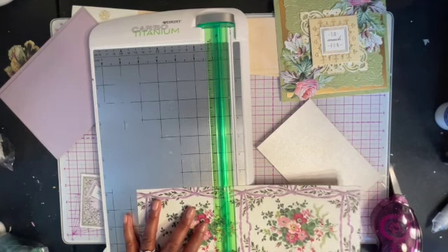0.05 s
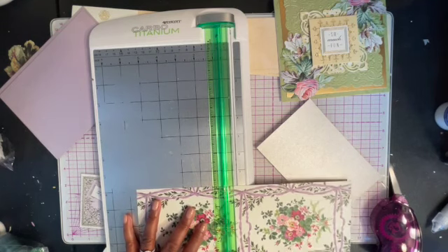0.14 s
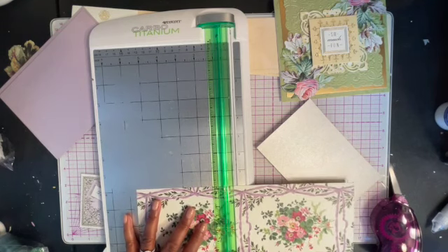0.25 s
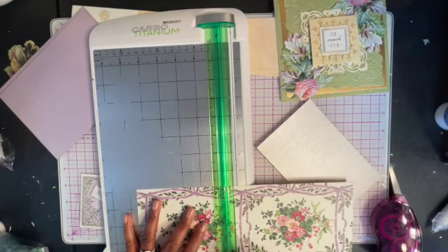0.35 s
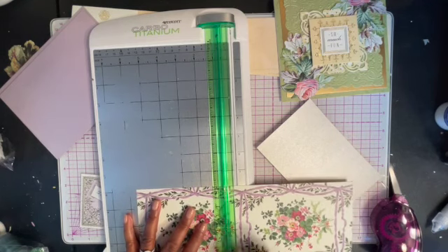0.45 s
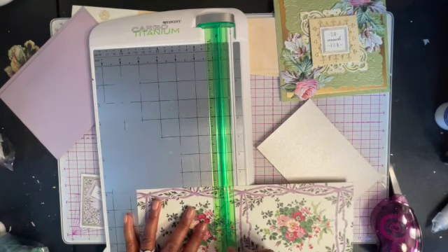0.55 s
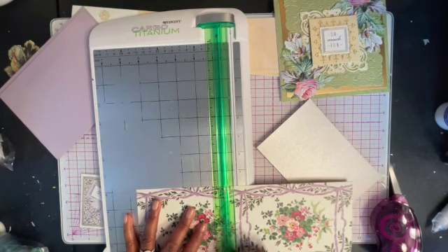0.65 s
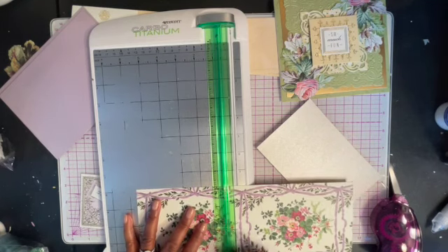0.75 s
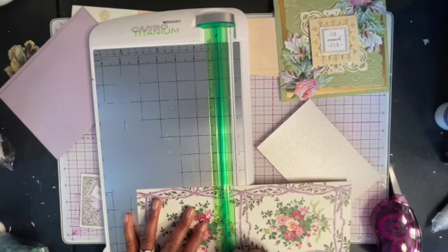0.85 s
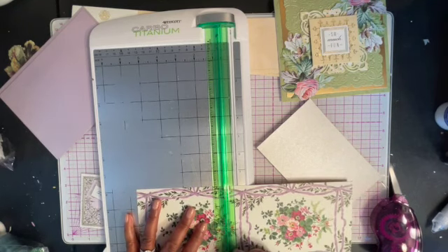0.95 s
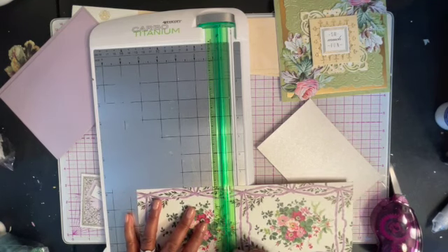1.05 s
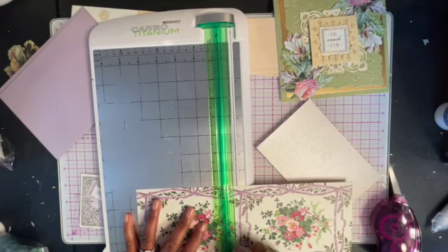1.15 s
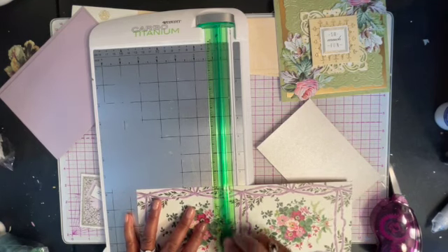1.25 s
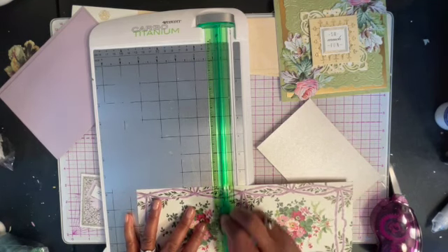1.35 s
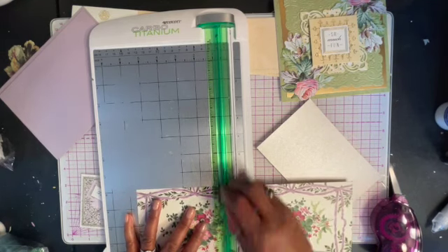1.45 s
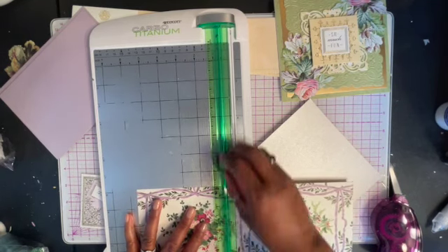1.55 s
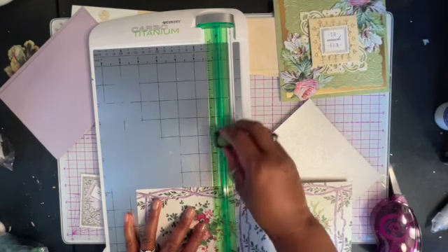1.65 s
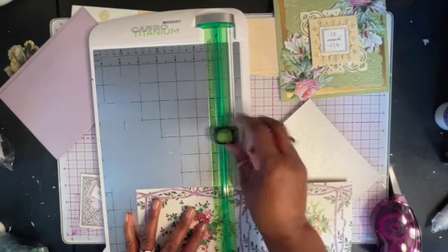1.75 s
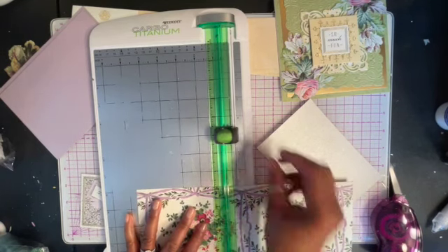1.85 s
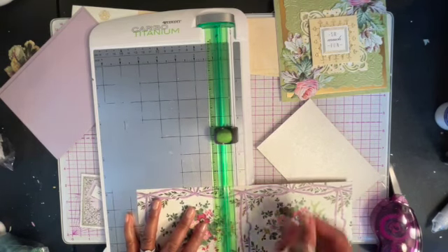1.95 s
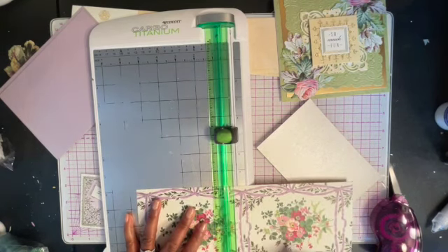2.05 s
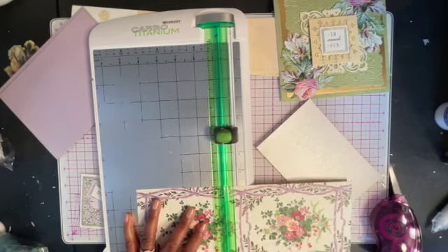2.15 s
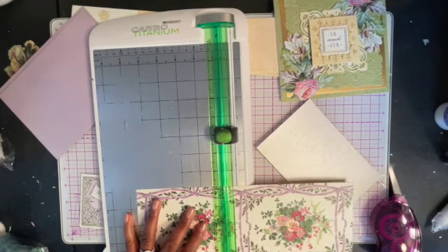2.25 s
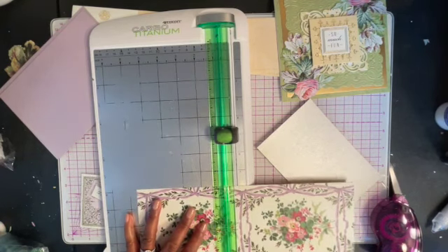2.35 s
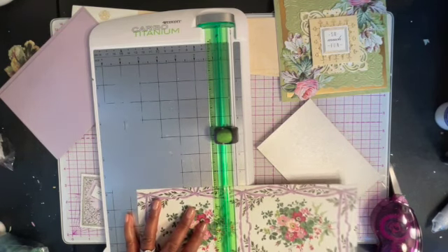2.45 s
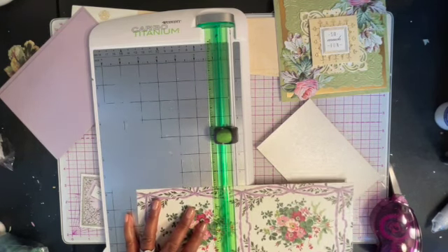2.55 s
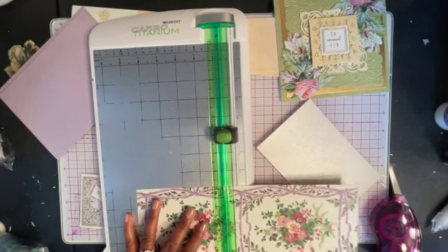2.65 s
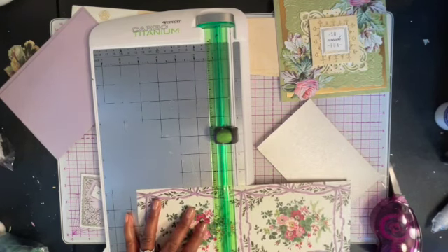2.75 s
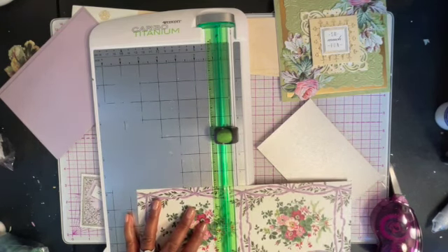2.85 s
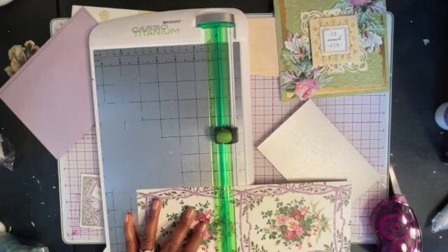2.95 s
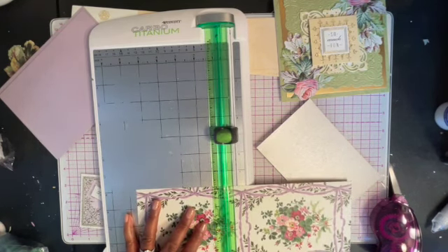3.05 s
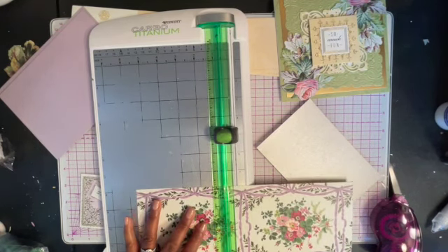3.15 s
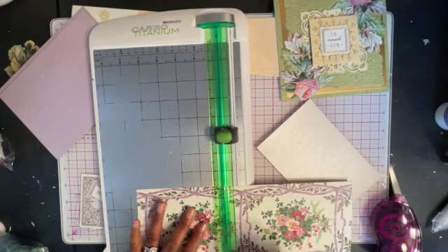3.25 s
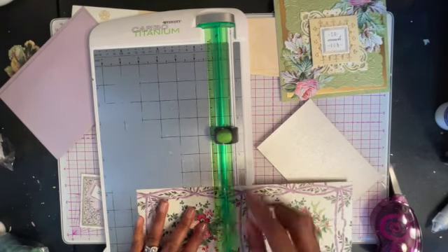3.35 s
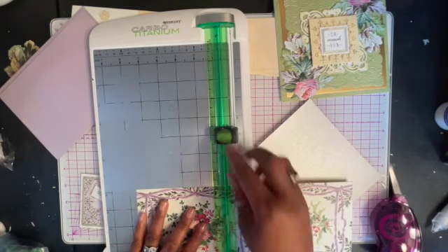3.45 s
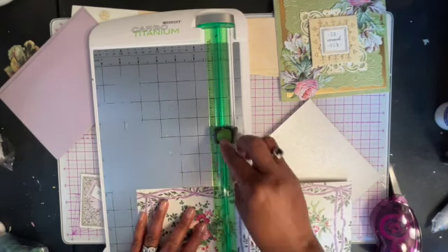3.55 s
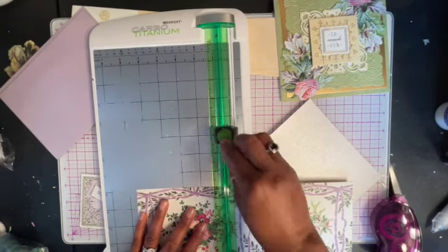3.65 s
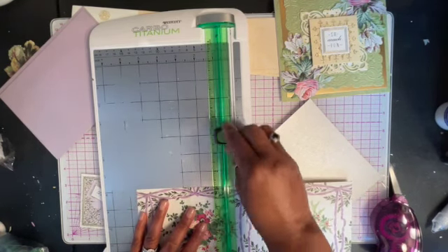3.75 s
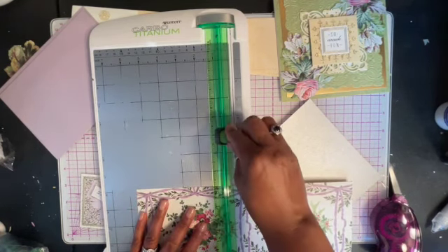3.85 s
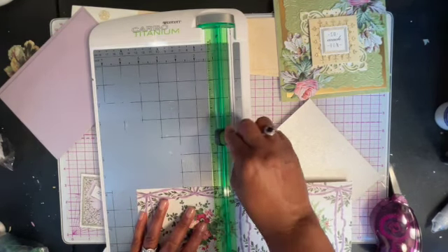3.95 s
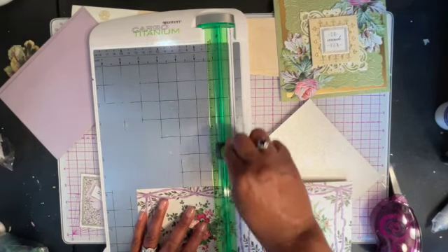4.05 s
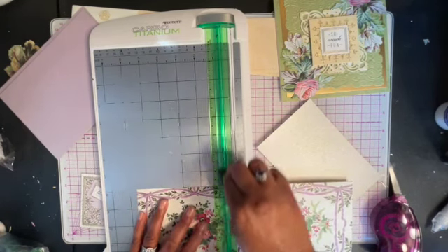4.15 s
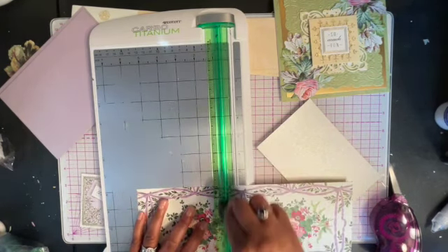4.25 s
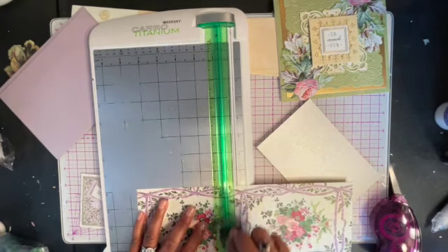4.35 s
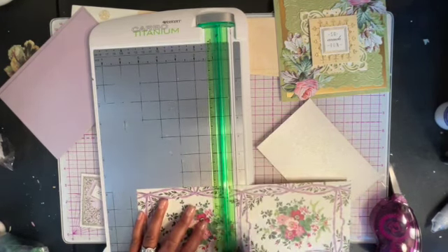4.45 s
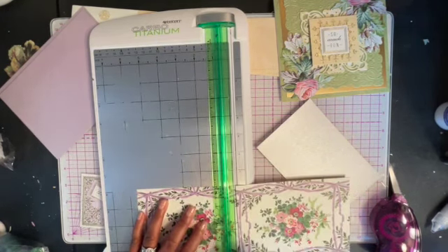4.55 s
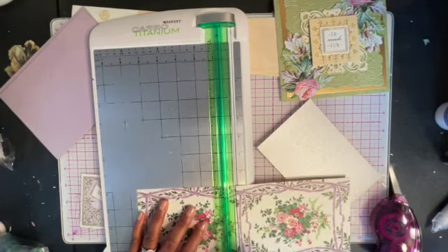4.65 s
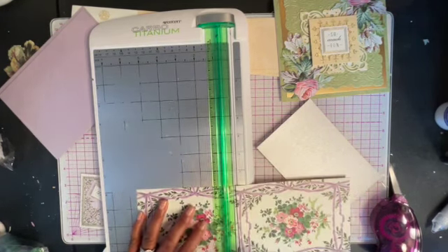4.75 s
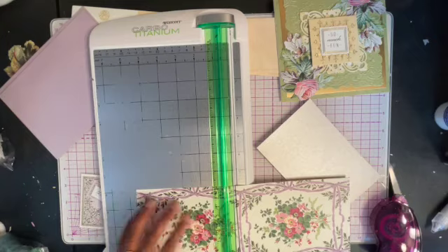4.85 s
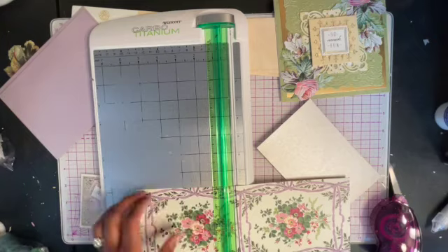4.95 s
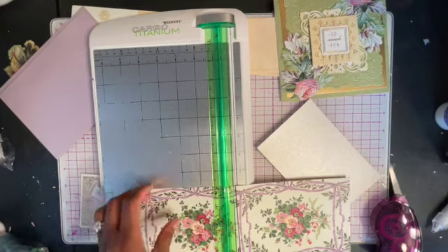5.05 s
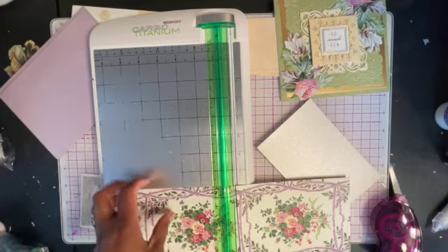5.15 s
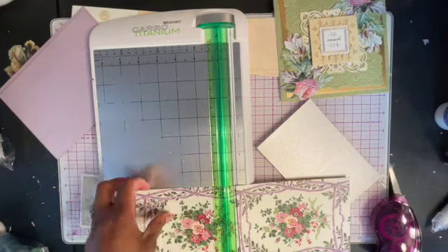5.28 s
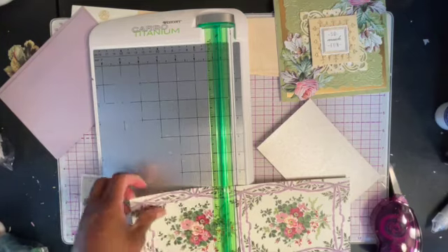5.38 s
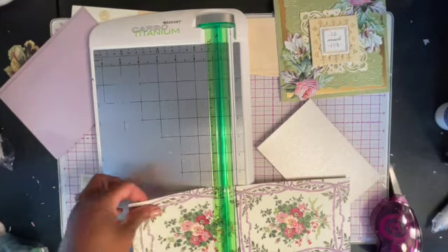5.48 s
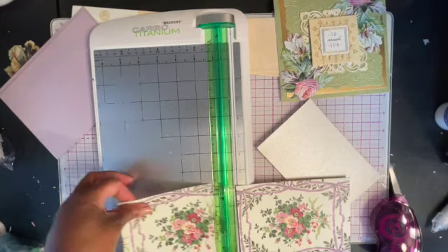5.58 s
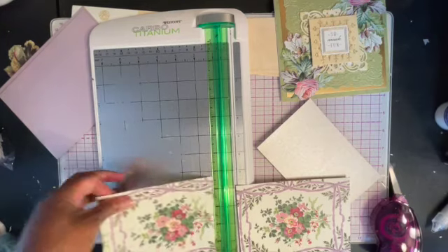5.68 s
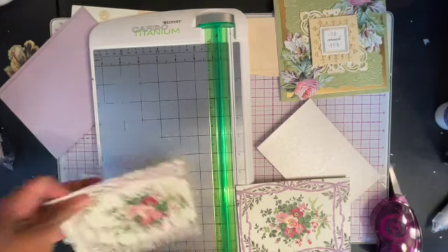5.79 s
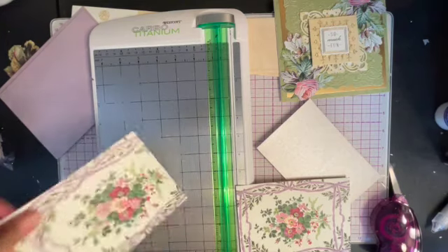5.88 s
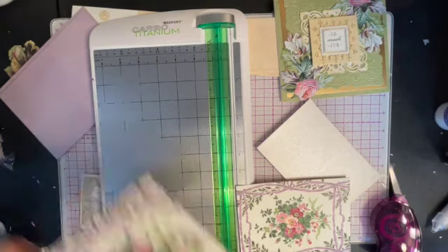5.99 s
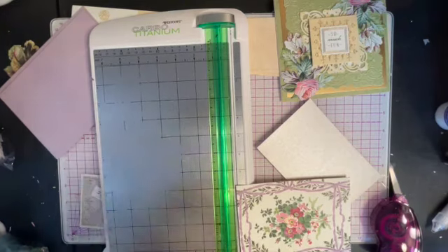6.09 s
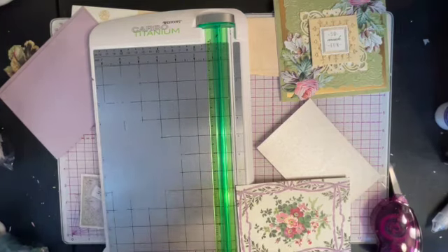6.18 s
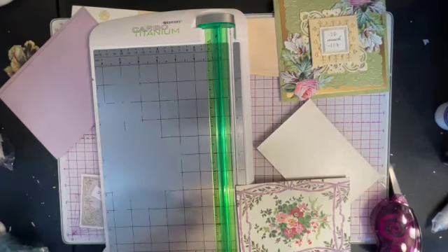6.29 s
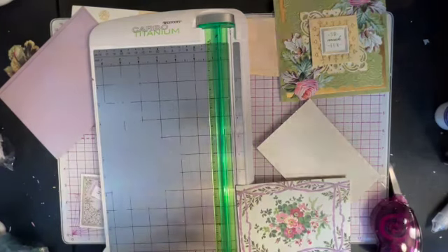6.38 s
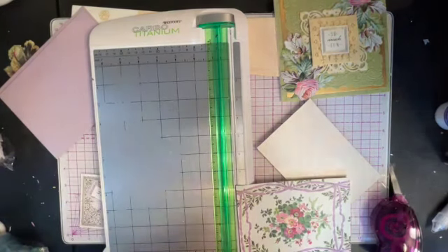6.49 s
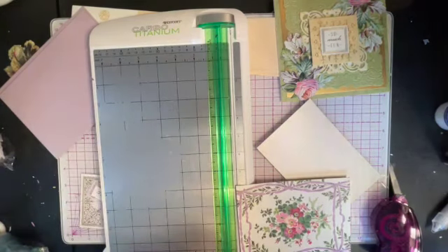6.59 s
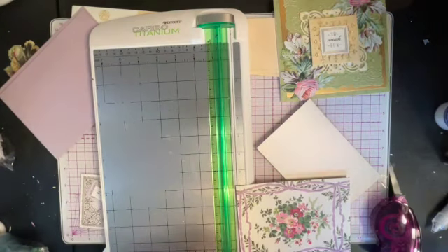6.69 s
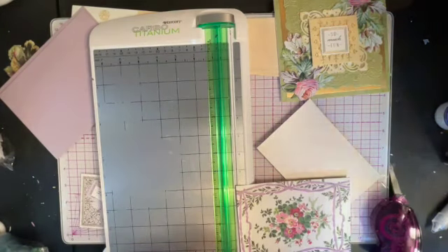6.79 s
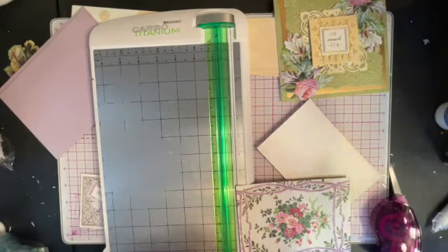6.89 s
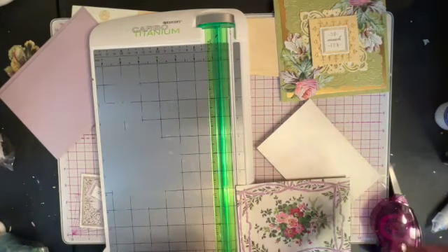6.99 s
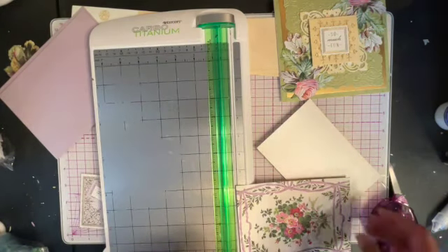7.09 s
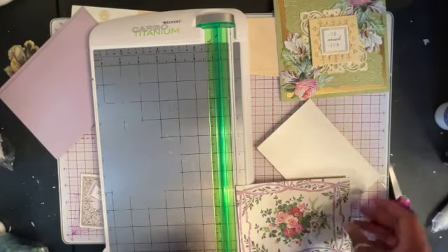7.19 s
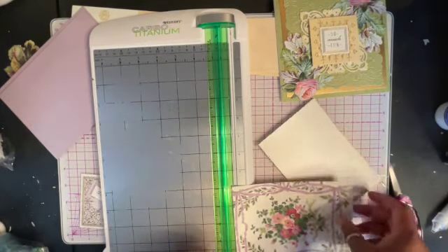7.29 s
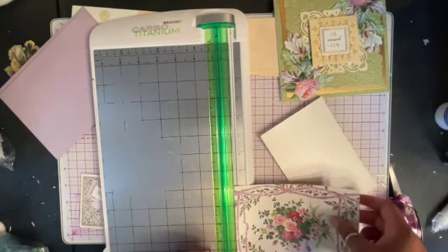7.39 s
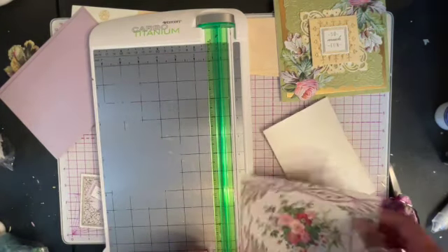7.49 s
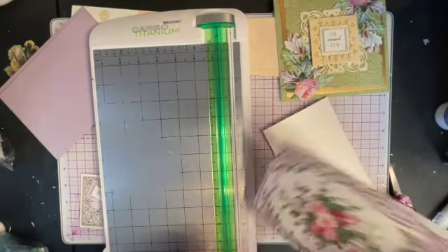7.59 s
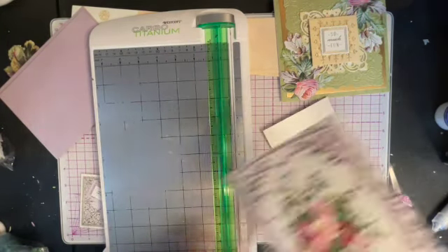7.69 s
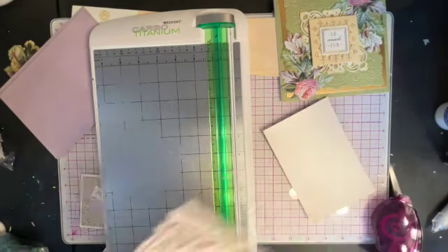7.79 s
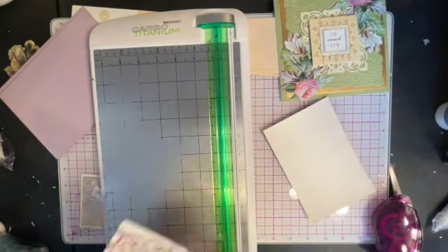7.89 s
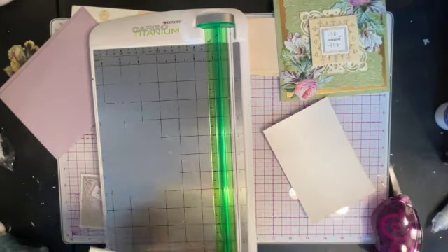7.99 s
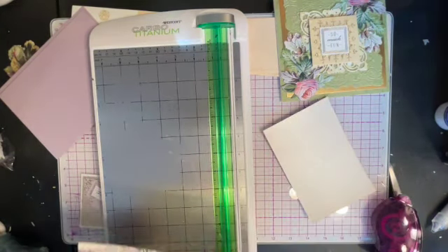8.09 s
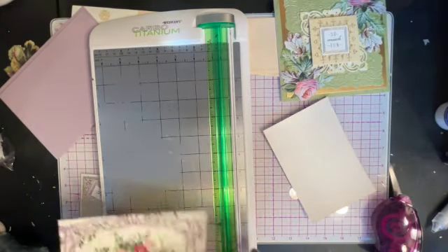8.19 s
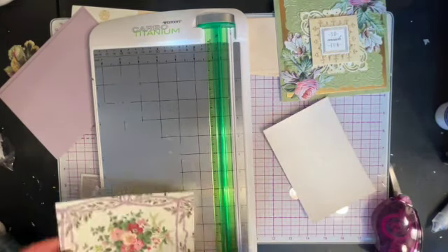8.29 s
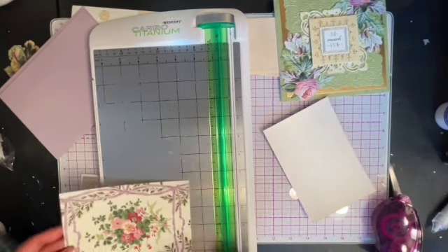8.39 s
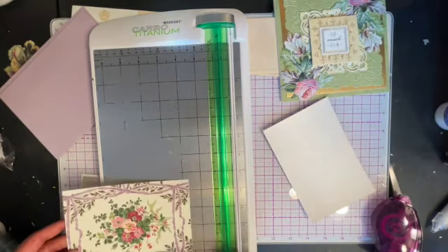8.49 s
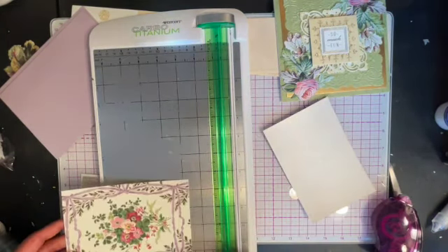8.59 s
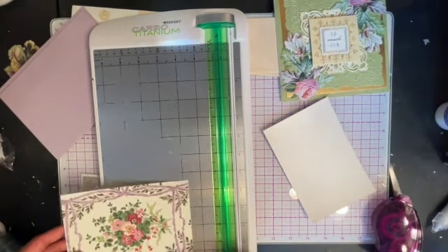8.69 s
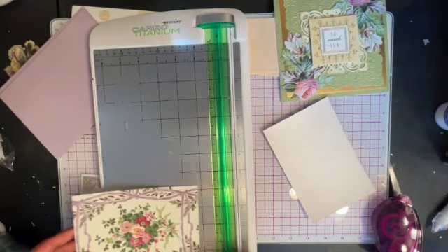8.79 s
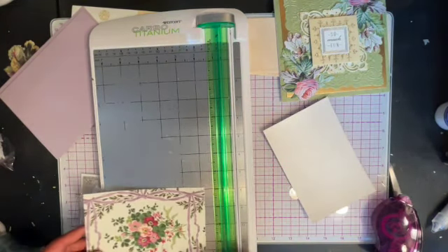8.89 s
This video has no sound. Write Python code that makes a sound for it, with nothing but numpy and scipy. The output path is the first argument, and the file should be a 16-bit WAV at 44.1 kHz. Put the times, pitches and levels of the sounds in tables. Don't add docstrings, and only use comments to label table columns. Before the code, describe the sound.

At a craft table, close up in stereo, a plastic paper trimmer clicks and taps while its carriage rubs lightly along the rail. A brief, rising, hissing slice cuts card and ends in a hard clack. Then a crisp snap, a quick papery pull with a loud high click, and cut pieces sliding, snapping and swishing away over soft thumps. The small quiet room hums faintly.

```python
import sys
import numpy as np
from scipy import signal
from scipy.fft import rfft, irfft, next_fast_len
from scipy.io import wavfile
from scipy.ndimage import uniform_filter1d, map_coordinates

SR = 44100
rng = np.random.default_rng(int(sys.argv[2]) if len(sys.argv) > 2 else 0)


def boost_factor(decibels):
    exponent = np.asarray(decibels, float) / 20
    return 10 ** exponent


def bounce(signal):
    frames = np.transpose(np.atleast_2d(signal))
    limited = np.clip(frames, -1, 1)
    pcm = np.round(limited * 32767).astype(np.int16)
    wavfile.write(sys.argv[1], SR, pcm)


N = 393792

# f/Hz, width/Hz, level/dB
DECK_MODES = [(630, 39.4, 7), (758.7, 24.3, 7), (882, 53, -2.5), (1130, 21, -9), (1390, 77, -14)]
TABLE_MODES = [(140, 14.2, 4.5), (192, 34, -1), (240, 22.8, -0.5), (320.6, 101, -8.5), (366, 84, -7),
               (474, 236, -16)]
SHELL_MODES = [(1280, 610, -3), (2010, 320, -0.5), (2500, 624, -2), (3440, 500, -2.5), (3740, 340, -3)]
STAND_MODES = [(42.6, 30, 0.5), (64.6, 88, -1)]
DEAD_HZ, DEAD_WIDTH_HZ, DEAD_DB = 454, 53, -8

# f/Hz, level/dB per Hz
HISS_COLOUR = [(2500, -16), (4000, -2.5), (5500, 3.5), (7200, 3), (9500, 4), (12000, -2), (14000, -1.5),
               (15600, -1)]
AIR_COLOUR = [(15, -47), (25, -54), (69, 7), (168, -1.5), (315, -12.5), (487, 7.5), (716, -8.5),
              (890, -2.5), (1110, -15.5), (2020, -11.5), (3280, -30.5), (5850, -32), (8000, -41.5),
              (10400, -46.5), (17600, -120)]
AIR_DB = -64.5
# f/Hz, t60/s
ROOM_T60 = [(200, 0.35), (1500, 0.046), (8000, 0.06)]

# f/Hz, lead/rad
PORT_LEAD = [(150, 0), (800, -.9), (1200, .8), (3000, .7), (5000, 1.2), (7000, 1.9), (8600, 2.65),
             (10500, 3.14), (11600, 3.4), (13000, 5.3), (16000, 6.3)]
# f/Hz, likeness/1
PORT_LIKENESS = [(60, .99), (300, .98), (600, .9), (1500, .88), (2800, .85), (4500, .68), (8500, .95),
                 (10500, .92), (14000, .94)]
# f/Hz, level/dB
PORT_LEAN = [(400, -.5), (1400, -1.5), (3000, -2), (6000, -.4)]

# t/s, level/dB
SHAKES = [(.4, -57), (0.718, -52.5), (1.27, -58.5), (2.13, -62), (3.6, -55.5), (3.85, -49.5), (4.18, -47),
          (4.53, -45.5), (5.15, -57.5), (5.36, -58), (5.76, -54.5), (7.27, -49), (8.501, -59)]
SHAKE_RISE_S, SHAKE_FALL_S = 0.1, 0.28

# fastest t/s, rise/s, fall/s, fibre hiss level/dB, scrape over hiss/dB
HAND_SLIDES = [(0.047, 0.68, 0.044, -62.5, 7), (.8, 0.29, 0.077, -77.5, 9), (.918, 0.038, 0.17, -81.5, 13),
               (1.162, 0.01, 0.71, -65.5, 2.5), (1.448, 0.2, 0.16, -55.5, -1.5), (1.66, 0.4, 0.046, -70, 0),
               (1.798, 0.077, 0.029, -83.5, 19.5), (2.23, 0.14, 0.059, -79, 19),
               (2.608, 0.18, 0.16, -68.5, 8.5), (3.065, 0.093, 0.025, -68, 9.5),
               (3.2, 0.043, 0.37, -73.5, -0.5), (4.146, 0.2, 0.14, -57, 9), (4.96, 0.38, 0.028, -66.5, 2.5),
               (5.148, 0.21, 0.019, -70, 4), (5.24, 0.036, 0.27, -65.5, 7), (5.448, 0.12, 0.3, -60.5, 7),
          (5.77, .05, 0.14, -65, 4.5), (5.955, 0.087, 0.028, -66, 3.5), (6.142, 0.03, 0.17, -48.5, -4),
          (6.36, 0.12, 0.87, -91.5, 17), (6.614, 0.0098, 0.049, -61.5, 3.5), (6.798, 0.25, 0.85, -67.5, 2),
          (7.231, 0.027, 0.15, -53.5, 1.5), (7.483, 0.05, 0.11, -59.5, 7), (7.674, 0.069, 0.14, -59, 0),
          (7.89, 0.068, .15, -58, 4.5), (7.945, 0.07, 0.068, -48.5, 1.5), (7.99, 0.044, 0.14, -52.5, -2.5),
          (8.07, 0.045, 0.089, -61, 2.5), (8.26, 0.14, 1, -68.5, -5), (8.582, 1, 1, -73, 4.5),
          (8.93, 0.0074, 0.16, -51, 9.5)]
# start t/s, end t/s, fibre hiss level/dB, scrape over hiss/dB
STROKES = [
    (4.201, 4.505, -48.5, 5),
    (5.541, 5.708, -44.5, -4),
    (7.334, 7.398, -58, -3.5),
    (7.433, 7.493, -54.5, -5.5),
]
STROKE_RISE_S, STROKE_FALL_S = 0.015, 0.013
# heaviest t/s, rise/s, fall/s, deck drone level/dB, table rumble over drone/dB
PRESSES = [(0.0, .1, 0.22, -64.5, 3.5), (.84, 0.26, 0.34, -63.5, -1), (1.036, 0.22, 0.02, -54.5, -3),
           (1.236, 0.29, 0.79, -58.5, 1.5), (2.243, 0.097, 0.036, -35.5, -14), (2.592, 0.18, 0.2, -57, 3),
           (3.075, 0.072, 0.11, -57.5, 7.5), (3.55, 0.1, 0.1, -59, 0), (4.075, 0.25, 0.35, -43.5, -5.5),
           (4.17, .03, 0.44, -54.5, 8), (4.28, 0.2, 0.15, -44, -7), (4.46, 0.058, 0.093, -51.5, 1),
           (4.525, 0.027, 0.058, -41, 4.5), (4.841, 0.006, 0.28, -57.5, 13.5),
           (4.998, 0.057, 0.33, -61.5, 9), (5.242, 0.023, 0.078, -51, 1), (5.7, 0.62, 0.23, -51.5, -8.5),
           (5.8, 0.061, 2.3, -68.5, 4), (6.136, 0.08, 0.093, -65.5, 13), (6.476, 0.22, 7.3, -70.5, 3),
           (7.27, 0.073, 0.19, -43, 1.5), (7.94, 0.15, 0.13, -54.5, -5.5), (8.25, 0.012, 0.045, -55, -3),
           (8.52, 0.15, 2.9, -65, -6)]
REST_HISS_DB, REST_SCRAPE_DB, REST_DECK_DB, REST_TABLE_DB, REST_SWAY_DB = -102, -83, -76, -75.5, -74.5
PATCH_DB, GRAIN_DB = 3.1, 2.8
CATCHES_PER_S, CATCH_DB, CATCH_SCATTER_DB, LARGEST_CATCH = 300, -7.5, 6.5, 2.5

# t/s, crack peak level/dB, deck ring over crack/dB, bright tip over crack/dB
TAPS = [(0.6804, -42.5, 6, -29), (.8275, -62, 14, -14), (0.9382, -54, 13.5, -31), (0.9928, -43.5, -5, -21),
        (1.1488, -51, 0.5, -20), (1.5536, -48, 5.5, -27), (1.7928, -50.5, 3, -16), (2.2152, -42.5, 1, -63),
        (3.78, -31, 4, -33), (3.844, -30, 5, -30), (4.1948, -49.5, 10, -8), (4.6924, -45.5, 2, -35),
        (4.761, -55, 16.5, -23), (4.9263, -45, 3.5, -7), (5.1078, -41, 11, -18.5), (5.215, -44, 4.5, -22.5),
        (5.231, -42.5, 2.5, -23), (5.5085, -39, 8.5, -16), (8.3232, -56, 6, -30), (8.4576, -45, 8.5, -19),
        (8.6881, -55.5, 9, -32)]
TAP_HZ, TAP_T60_S = 1230, 0.046
# t/s, crack peak level/dB, bright tip over crack/dB, crack f/Hz, t60/s
CLACKS = [(0.3563, -24.5, -28.5, 1360, 0.046), (0.7182, -45, -26, 2630, 0.2),
          (0.773, -29, -34, 1390, 0.043), (0.9204, -43, -15.5, 2120, 0.033), (1.268, -31, -41, 1640, 0.019),
          (1.677, -44.5, -25, 1340, 0.035), (2.0852, -46.5, -12, 2390, 0.047),
          (2.1392, -29.5, -24.5, 1090, 0.034), (2.164, -29, -30, 1330, 0.056),
          (2.5713, -46, -19, 1850, 0.15), (2.7447, -50, -3.5, 2370, 0.033),
          (3.0725, -45.5, -42, 1380, 0.066), (3.5187, -43, -22, 2580, 0.031),
          (4.133, -40, -9.5, 2740, 0.048), (4.5185, -14.5, -21.5, 1290, 0.031),
          (4.9785, -32.5, -20.5, 1270, 0.063), (5.71, -18, -18.5, 3320, 0.044),
          (6.094, -43.5, -10.5, 1117, 0.12), (6.135, -31, -16, 1038, 0.04), (6.61, -45, -14, 1600, 0.051),
          (7.243, -14.5, -15.5, 3000, 0.068), (7.2542, -17.5, -18, 2350, 0.024)]
SNAPS = [(.149, -48, -5.5, 2330, 0.019), (1.2081, -38, -27.5, 1240, 0.13), (1.3, -32, -36, 2500, 0.044),
         (2.107, -43, -7, 4500, 0.01), (2.4918, -41.5, -2, 4320, 0.021), (4.6002, -28.5, -33, 1360, 0.033),
         (4.7157, -16.5, -26, 2380, 0.0088), (5.151, -46.5, -11, 4440, 0.045),
         (5.3433, -35, -18.5, 3360, 0.045), (5.3925, -35, -22, 2760, 0.06),
         (5.4367, -39.5, -11, 2695, 0.091), (6.1619, -38.5, -4, 2770, 0.018),
         (6.1971, -34.5, -13, 1800, .09), (6.2564, -35, -13, 1130, 0.037), (7.216, -52, -9, 2530, .053),
         (7.8463, -46, -15.5, 1260, 0.08), (8.2288, -34.5, -16, 1720, 0.031),
         (8.8556, -49.5, -4, 3120, 0.1)]
CLACK_RING_DB, SNAP_RING_DB = -6.5, -14.5
RING_LOSS_DB = 2

# t/s, peak level/dB, f/Hz, t60/s
FLICKS = [(.349, -44, 1900, .08), (3.772, -40, 810, 0.1), (3.781, -21.5, 765, 0.038),
          (3.838, -40, 1450, .06), (4.133, -40, 9000, .03), (4.716, -31, 2700, 0.019),
          (5.076, -55, 4100, 0.046), (5.109, -25.5, 674, 0.024), (5.232, -32.5, 707, 0.035),
          (5, -31.5, 660, 0.028), (5.712, -19, 3230, .025), (7.236, -31, 3200, 0.058),
          (7.258, -26, 1950, 0.017), (7.285, -37, 1160, 0.032), (8.7, -41.5, 750, 0.11),
          (7.545, -54, 4200, .03), (2.18, -36, 480, 0.1), (2.205, -35, 410, 0.059),
          (2.247, -42, 334, 0.051), (1.3, -46, 2700, 0.046), (1.3, -43, 2330, .05), (4.3, -37, 2450, 0.02),
          (7.245, -21, 310, .022), (5.712, -20, 760, 0.06), (6.013, -42.5, 393, 0.045),
          (1.03, -59, 1900, 0.032), (4.717, -20.5, 2050, 0.02), (4.522, -19, 790, 0.048),
          (.36, -32, 2930, 0.048), (2.336, -51, 1370, .06), (5.712, -25, 1350, .045)]
# t/s, peak level/dB, f/Hz, t60/s
NUDGES = [(1.136, -48, 626, 0.048), (1.226, -40, 640, 0.22), (1.272, -35, 656, 0.044),
          (1.318, -39.5, 714, 0.069), (1.334, -39, 630, 0.099), (1.417, -51, 720, .08),
          (1.44, -45, 705, .06), (1.475, -48.5, 1100, 0.075), (1.523, -44.5, 655, 0.022),
          (2.086, -51.5, 694, 0.14), (2.196, -29.5, 624, 0.067), (2.222, -31.5, 660, 0.071),
          (2.235, -43, 1850, .05), (2.262, -39, 523, 0.043), (3.072, -43.5, 1390, 0.072),
          (3.357, -50, 850, .07), (3.783, -36.5, 2700, 0.015), (3.845, -27, 2570, 0.022),
          (3.99, -43, 770, 0.095), (4.017, -40.5, 750, .06), (4.046, -39, 730, 0.09),
          (4.065, -34, 750, .06), (4.085, -30.5, 780, 0.086), (4.11, -33.5, 735, 0.043),
          (4.139, -30.5, 730, 0.04), (4.145, -36.5, 2600, 0.056), (4.483, -41, 740, .05),
          (4.503, -31, 780, 0.069), (4.521, -14.5, 1346, 0.034), (4.521, -24.5, 780, 0.056),
          (5.314, -51, 3150, 0.069), (5.365, -47, 2820, .04), (5.418, -41, 2260, 0.053),
          (7.263, -30, 770, 0.15), (7.256, -30, 384, 0.1), (7.325, -47, 3940, .02),
          (7.438, -43, 5700, 0.074), (7.783, -45.5, 560, 0.067), (7.895, -43, 930, .06),
          (7.936, -42, 1000, 0.087), (7.938, -46, 2980, .06), (7.982, -50, 5840, .04),
          (8.022, -46, 1103, 0.04), (8.688, -47.5, 800, 0.11)]
NUDGE_RISE_S, NUDGE_SPREAD = 0.002066, .14
# t/s, peak level/dB, f/Hz, t60/s
THUMPS = [(0.367, -32.5, 202, 0.097), (0.691, -30.5, 216, 0.082), (0.782, -39, 140, 0.12),
          (1.79, -41, 603, 0.1), (2.143, -30, 188, 0.022), (2.163, -25.5, 386, 0.13),
          (2.213, -29, 348, 0.1), (2.237, -28, 352, 0.078), (2.335, -39, 166, 0.069),
          (2.605, -39.5, 366, 0.15), (3.058, -40.5, 352, 0.071), (3.532, -38, 140, 0.29),
          (3.791, -30.5, 137.4, 0.4), (3.858, -37.5, 231, 0.13), (4.524, -25, 206, 0.082),
          (4.728, -37, 138, 0.33), (4.844, -24, 240, 0.1), (4.977, -31.5, 210, 0.023),
          (5.115, -42.5, 268, 0.12), (5.228, -38.5, 558, 0.067), (5.718, -30.5, 137.6, 0.42),
          (5.88, -40, 384, 0.065), (6.033, -42.5, 405, 0.13), (6.136, -33, 265, 0.02),
          (7.113, -31, 133, 0.32), (7.246, -20.5, 151, 0.017), (7.272, -40, 362, 0.13),
          (7.502, -43.5, 382, 0.046), (7.767, -36.5, 421, 0.056), (8.46, -40, 140, 0.031)]
# t/s, peak level/dB, f/Hz
KNOCKS = [
    (1.2698, -32.5, 1500),
    (1.3015, -35, 2600),
    (4.7161, -11, 2400),
    (5.7107, -8.5, 3150),
    (7.2478, -17, 1500),
]
KNOCK_SPREAD = .3

# t/s, level/dB, f/Hz
RAIL = [
    [(1.15, -75, 1187), (1.228, -55, 978), (1.672, -52.5, 1111), (1.75, -83, 1020)],
    [(3.93, -55, 996), (4.066, -40.5, 958), (4.41, -36, 1232), (4.51, -46, 1217)],
]
# t/s, level/dB, f/Hz
CARD = [
    [(1.18, -63, 2620), (1.524, -52, 2644), (1.7, -61.5, 2660)],
    [(4.19, -62, 3030), (4.234, -40, 2794), (4.51, -51, 2950)],
    [(5.52, -45, 3200), (5.56, -40, 3095), (5.7, -37.5, 3280)],
]
# t/s, level/dB, f/Hz
BLADE = [
    [(4.19, -39, 7180), (4.214, -45, 7340), (4.51, -43, 7460)],
]
# t/s, level/dB, f/Hz
NOTES = [
    [(4.195, -44, 960), (4.235, -38.5, 1086), (4.28, -52, 1137)],
    [(4.2, -50, 647), (4.3, -44, 627), (4.34, -53, 623)],
    [(4.33, -60, 1388), (4.37, -43, 1400), (4.46, -54, 1390)],
    [(2.97, -81, 3330), (3.03, -70, 3280), (3.07, -72, 3350)],
    [(1.32, -64, 2800), (1.37, -62, 2570), (1.41, -72, 2590)],
]
# t/s, level/dB, f/Hz
RASPS = [
    [(5.41, -57, 2500), (5.46, -52, 2340), (5.49, -54, 2400)],
    [(5.525, -52, 2500), (5.6, -49, 2277), (5.7, -56, 2100)],
    [(4.25, -49, 2600), (4.35, -51, 2486), (4.4, -43, 2490)],
    [(2.2, -48, 1510), (2.235, -52, 1990), (2.27, -60, 1750)],
]
# t/s, level/dB, f/Hz
STIRS = [
    [(2.37, -78, 2600), (2.44, -73, 2700), (2.47, -76, 2700)],
    [(4.2, -56, 3900), (4.33, -51.5, 3700), (4.5, -51, 3600)],
]


def unit(x):
    return x / np.sqrt(np.mean(x ** 2) + 1e-20)


def along(points, hz):
    f, v = np.transpose(points)
    return np.interp(np.log(hz + 1), np.log(f + 1), v)


def wobble(rate):
    knots = rng.standard_normal(int(N * rate / SR) + 4)
    return map_coordinates(knots, [np.arange(N) * rate / SR])


def filtered(x, response):
    n = x.shape[-1]
    m = next_fast_len(n + 4096)
    return irfft(rfft(x, m) * response(np.fft.rfftfreq(m, 1 / SR)), m)[..., :n]


def body(modes):
    def response(f):
        return sum((-1) ** k * boost_factor(db) * 1j * f * w / (c * c - f * f + 1j * f * w)
                   for k, (c, w, db) in enumerate(modes))
    return response


def dead(f):
    off = DEAD_HZ ** 2 - f * f
    loss = 1j * f * DEAD_WIDTH_HZ
    return (off + loss * boost_factor(DEAD_DB)) / (off + loss)


def peaked(x, db):
    return boost_factor(db) * x / np.abs(x[0]).max()


def add(track, s, x):
    track[:, round(s * SR):][:, :x.shape[1]] += x


def swells(rows, rest_db):
    t = np.arange(0, N, 64) / SR
    a, b, rise, fall, db = np.transpose(rows)[:, :, None]
    before = np.maximum(a - t, 0) / np.maximum(rise, .003)
    after = np.maximum(t - b, 0) / np.maximum(fall, .003)
    power = boost_factor(2 * rest_db) + boost_factor(2 * (db - 20 * (before + after))).sum(axis=0)
    return np.interp(np.arange(N) / SR, t, np.sqrt(power))


def both(rows, rest_db, other_rest_db):
    rows = np.array(rows)
    other = np.c_[rows[:, :4], rows[:, 4] + rows[:, 5]]
    return swells(rows[:, :5], rest_db), swells(other, other_rest_db)


def grit(scatter_db, rate, patch_db):
    catching = rng.standard_normal((2, N)) * boost_factor(scatter_db * wobble(rate))
    z = signal.stft(catching, nperseg=512)[2]
    field = uniform_filter1d(rng.standard_normal(z.shape[1:]), size=3, axis=0)
    field = uniform_filter1d(field, size=12, axis=1)
    return signal.istft(z * boost_factor(patch_db * unit(field)), nperseg=512)[1][:, :N]


def air():
    tone = filtered(rng.standard_normal((2, N)), lambda f: boost_factor(along(AIR_COLOUR, f)))
    return boost_factor(AIR_DB + 0.43 * wobble(4.9)) * unit(tone)


def sway():
    rows = [(s, s, SHAKE_RISE_S, SHAKE_FALL_S, db) for s, db in SHAKES]
    level = swells(rows, REST_SWAY_DB)
    shudder = filtered(rng.standard_normal((2, N)), lambda f: body(STAND_MODES)(f) / (1 + (f / 110) ** 4))
    return level * boost_factor(1.1 * wobble(12)) * unit(shudder)


def slides():
    rows = [(s, s, *rest) for s, *rest in HAND_SLIDES]
    rows += [(a, b, STROKE_RISE_S, STROKE_FALL_S, db, over_db) for a, b, db, over_db in STROKES]
    return both(rows, REST_HISS_DB, REST_SCRAPE_DB)


def rubbing():
    fibres, friction = slides()
    drone, load = both([(s, s, *rest) for s, *rest in PRESSES], REST_DECK_DB, REST_TABLE_DB)
    grip = 1.1 * wobble(28)
    bumps = 1.3 * wobble(35)

    hiss = filtered(grit(2.1, 900, PATCH_DB), lambda f: boost_factor(along(HISS_COLOUR, f)))
    hiss = fibres * boost_factor(7.0 + grip) * unit(hiss)
    scrape = filtered(grit(GRAIN_DB, 500, PATCH_DB), body(SHELL_MODES))
    scrape = friction * boost_factor(grip) * unit(scrape)
    deck = filtered(grit(2.8, 200, 4.0), lambda f: body(DECK_MODES)(f) * dead(f))
    deck = drone * boost_factor(grip + bumps) * unit(deck)
    rumble = filtered(rng.standard_normal((2, N)), lambda f: body(TABLE_MODES)(f) * dead(f) * f / (f + 95j))
    rumble = load * boost_factor(4.17 * wobble(14)) * unit(rumble)
    return hiss + scrape + deck + rumble


def catches():
    when, chance, side = rng.random((3, round(CATCHES_PER_S * N / SR)))
    size = boost_factor(CATCH_SCATTER_DB * np.minimum(-np.log(1 - chance), LARGEST_CATCH))
    place = (when * N).astype(int)
    angle = 2 * np.pi * side
    ticks = np.array([np.bincount(place, size * turn(angle), N) for turn in (np.cos, np.sin)])
    tick = filtered(signal.unit_impulse(SR // 20), lambda f: body(SHELL_MODES)(f) + body([(5500, 4000, -8)])(f))
    ticking = signal.oaconvolve(ticks, tick[None], axes=1)[:, :N]
    return slides()[1] * boost_factor(CATCH_DB) * unit(ticking)


def contacts():
    out, t = np.zeros((2, N + SR)), np.arange(SR // 8) / SR
    lead = .012
    after = np.maximum(t - lead, 0)
    held = body([(c, 1.23 * w, db) for c, w, db in DECK_MODES])
    every = [(s, db, ring_db, tip_db, TAP_HZ, TAP_T60_S) for s, db, ring_db, tip_db in TAPS]
    every += [(s, db, CLACK_RING_DB, *rest) for s, db, *rest in CLACKS]
    every += [(s, db, SNAP_RING_DB, *rest) for s, db, *rest in SNAPS]
    snap = 1 + 2.5 * np.exp(-after / .0008)
    graze = boost_factor(-17) * np.exp(-np.abs(t - lead) / .0025)
    for s, db, deck_db, tip_db, hz, t60 in every:
        noise = rng.standard_normal((3, 2, len(t)))
        decay = boost_factor(-60 * after / max(t60, .004))
        fall = (1 - np.exp(-after / 0.00059)) * snap * decay
        swell = (1 - np.exp(-after / 0.0023)) * decay + graze
        struck = lambda f: body(SHELL_MODES)(f) * (boost_factor(-10.0) + body([(hz, .35 * hz, 0)])(f))
        crack = peaked(filtered(noise[0] * (fall + graze), struck), db)
        tip = filtered(noise[1] * (fall ** 1.26 + graze), lambda f: boost_factor(along(HISS_COLOUR, f)))
        tip = peaked(tip, db + tip_db + 20.0)
        ring = filtered(noise[2] * swell, lambda f: held(f) * dead(f))
        loss_db = RING_LOSS_DB * max(np.log2(hz / TAP_HZ), 0)
        ring = peaked(ring, db + deck_db + 2.5 - loss_db)
        add(out, s - lead, crack + tip + ring)
    return out[:, :N]


def room(x):
    hz, t, z = signal.stft(rng.standard_normal((2, SR // 3)), SR, nperseg=256)
    decay = boost_factor(-60 * t / along(ROOM_T60, hz)[:, None])
    tail = signal.istft(z * decay, SR, nperseg=256)[1]
    late = np.pad(x, (300, 0))[None]
    return signal.fftconvolve(late, tail / np.linalg.norm(tail[0]), axes=1)[:, :N]


def nudges(rows, rise_s):
    out, t = np.zeros((2, N + SR)), np.arange(SR // 8) / SR
    for s, db, hz, t60 in rows:
        envelope = (1 - np.exp(-t / rise_s)) * boost_factor(-60 * t / max(t60, .004))
        puff = rng.standard_normal((2, len(t))) * envelope
        woken = lambda f: body([(hz, NUDGE_SPREAD * hz, 0)])(f) * body([(hz, hz, 0)])(f)
        add(out, s - rise_s, peaked(filtered(puff, woken), db))
    return out[:, :N]


def thumps():
    out, t = np.zeros((2, N + SR)), np.arange(SR // 4) / SR
    for s, db, hz, t60 in THUMPS:
        push = rng.standard_normal((2, len(t))) * t * np.exp(-t * hz / 0.81)
        note = body([(hz, 2.92 / max(t60, .02), 0)])
        top = lambda f: note(f) + boost_factor(-13.0) * body(TABLE_MODES)(f)
        soft = lambda f: top(f) * f / (f + 90j) / (1 + 1j * f / 900) ** 2
        add(out, s, peaked(filtered(push, soft), db))
    return out[:, :N]


def singing(strokes, width_hz, share_db):
    out = np.zeros((2, N))
    for s, db, hz in map(np.transpose, strokes):
        now = np.arange(s[0], s[-1], 1 / SR)
        turn = 2 * np.pi * np.cumsum(np.interp(now, s, hz)) / SR
        rough = rng.standard_normal((2, 2, len(now)))
        a, b = filtered(rough, lambda f: 1 / (1 + (f / width_hz) ** 4))
        note = unit(a * np.cos(turn) + b * np.sin(turn))
        ends = signal.windows.tukey(len(now), .08)
        add(out, s[0], ends * boost_factor(np.interp(now, s, db) + share_db) * note)
    return out


def knocks():
    out, blow = np.zeros((2, N + SR)), signal.unit_impulse(SR // 20)[None] * [[1], [0]]
    for s, db, hz in KNOCKS:
        plastic = lambda f: body([(hz, KNOCK_SPREAD * hz, 0)])(f) * body([(hz, 2 * hz, 0)])(f)
        add(out, s, peaked(filtered(blow, plastic), db))
    return out[:, :N]


def ports(pair):
    turn = lambda f: np.arccos(np.clip(along(PORT_LIKENESS, f), -1, 1)) / 2
    shared, odd = filtered(pair, lambda f: np.array([np.cos(turn(f)), np.sin(turn(f))]))
    half = lambda f: np.exp(.5j * along(PORT_LEAD, f)) * boost_factor(along(PORT_LEAN, f) / 2)
    shift = lambda f: half(f) ** np.array([[1], [-1]])
    return filtered(np.array([shared + odd, shared - odd]), shift)


def scene():
    hits = contacts() + thumps() + knocks()
    played = air() + sway() + rubbing() + catches()
    played += hits + boost_factor(-16.5) * room(hits[0])
    played += nudges(FLICKS, .0004) + nudges(NUDGES, NUDGE_RISE_S)
    played += singing(RAIL, 370, -11) + singing(CARD, 520, -5) + singing(BLADE, 620, 2.5)
    played += singing(NOTES, 46, 0) + singing(RASPS, 450, 0) + singing(STIRS, 320, 0)
    return ports(played)


def roll_off(x):
    return signal.sosfilt(signal.butter(12, 16890, fs=SR, output="sos"), x)


def record(dry):
    top_hz = 15760
    mix = filtered(dry, lambda f: 1 / (1 + (f / top_hz) ** 300))
    return roll_off(mix)


dry = scene()
out = record(dry)
bounce(out)
```